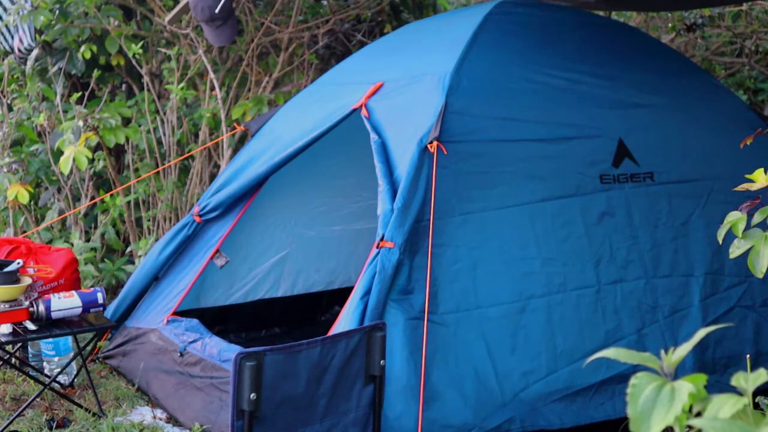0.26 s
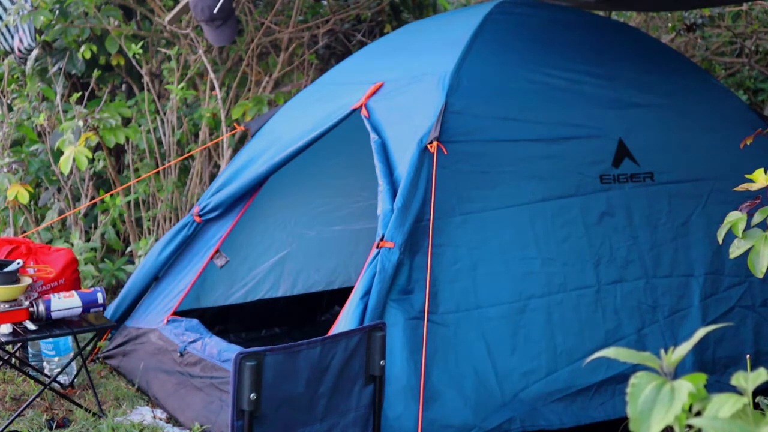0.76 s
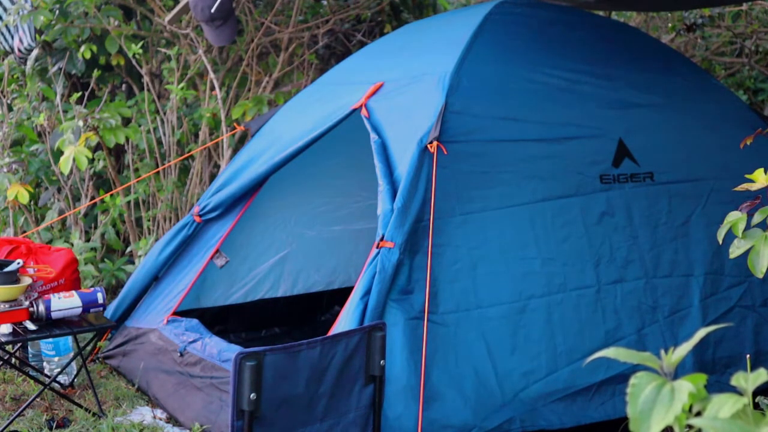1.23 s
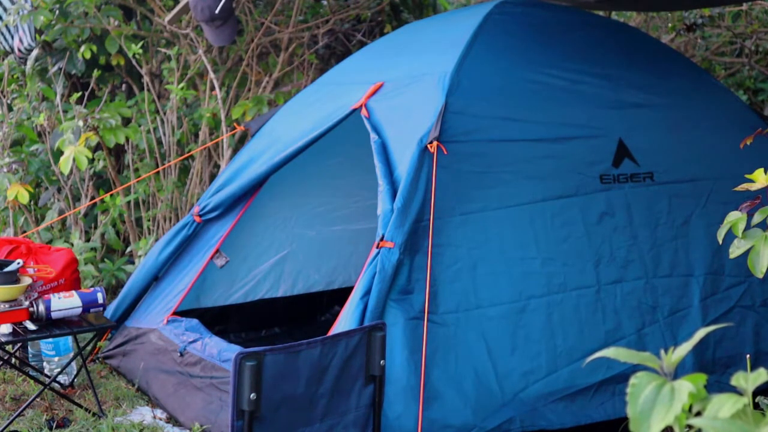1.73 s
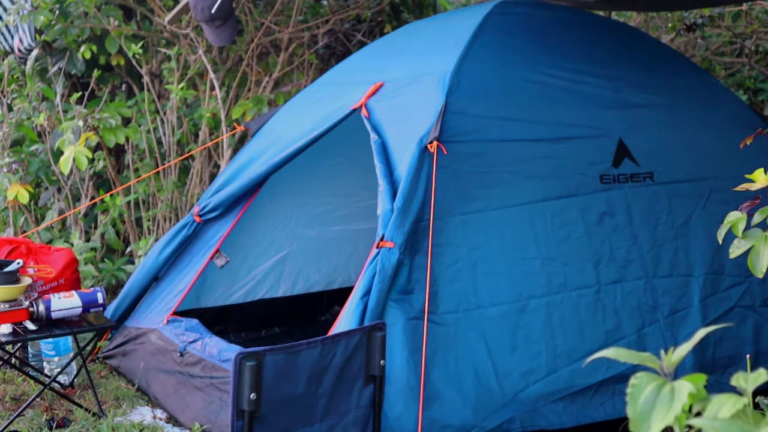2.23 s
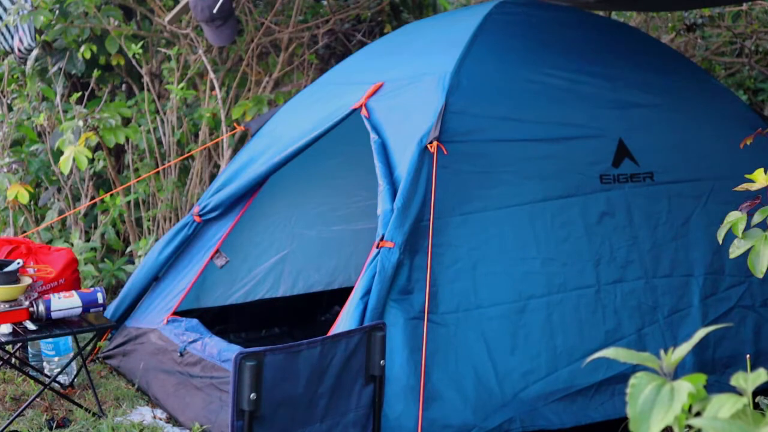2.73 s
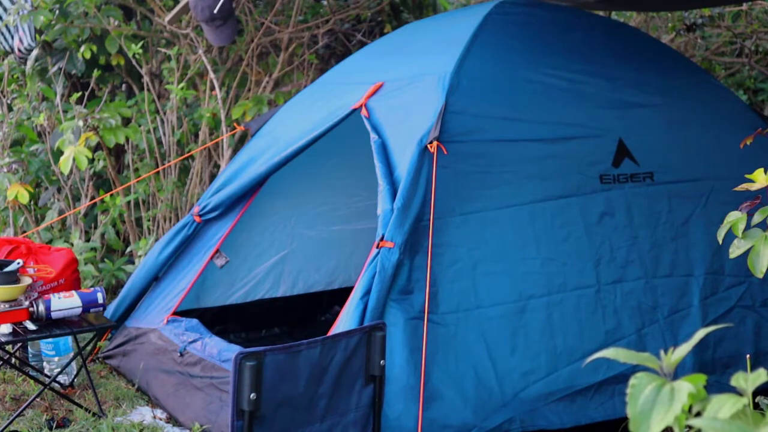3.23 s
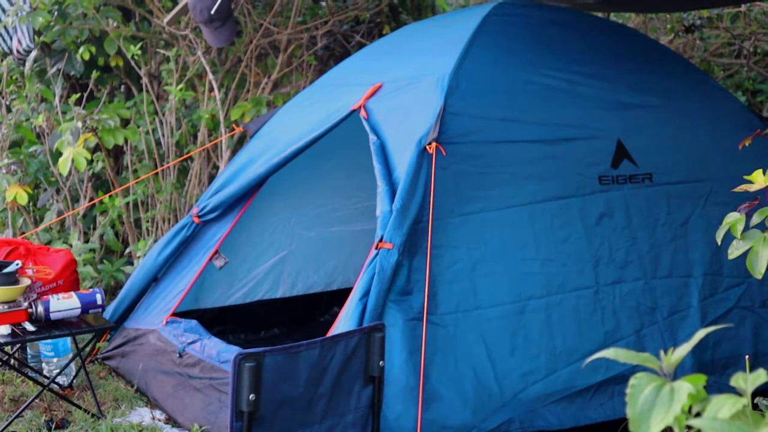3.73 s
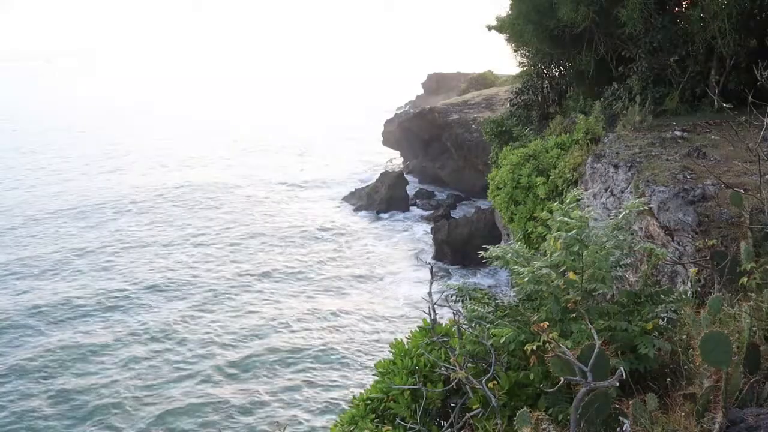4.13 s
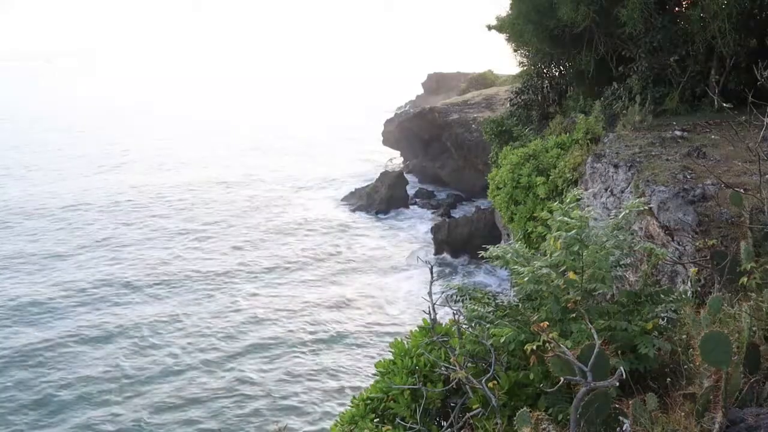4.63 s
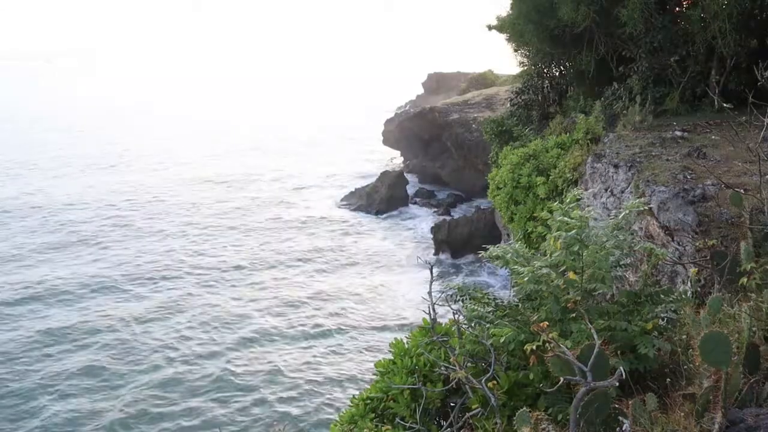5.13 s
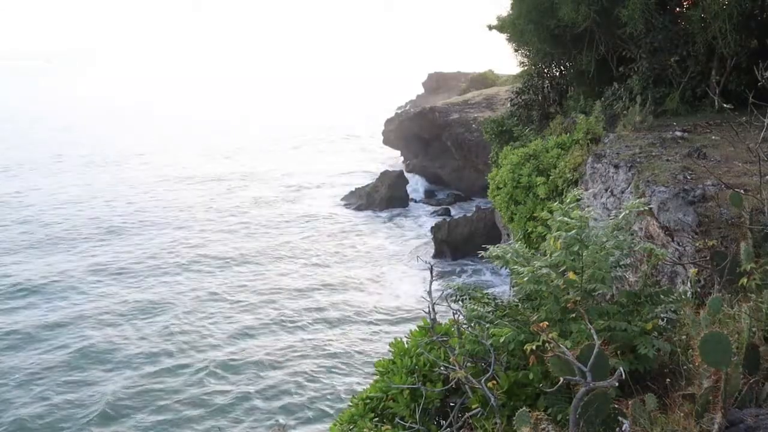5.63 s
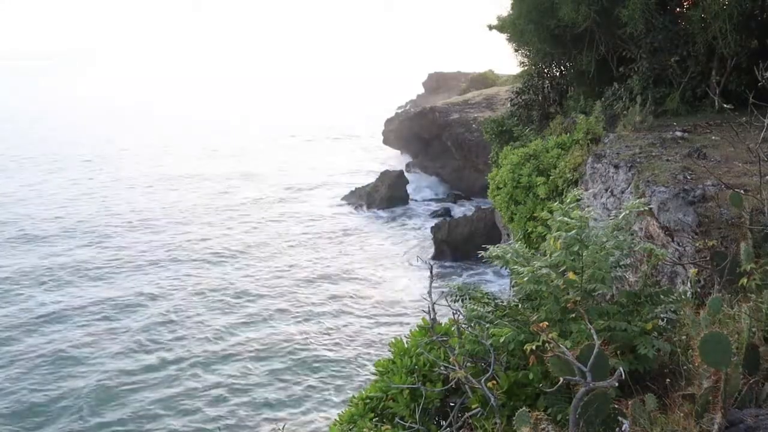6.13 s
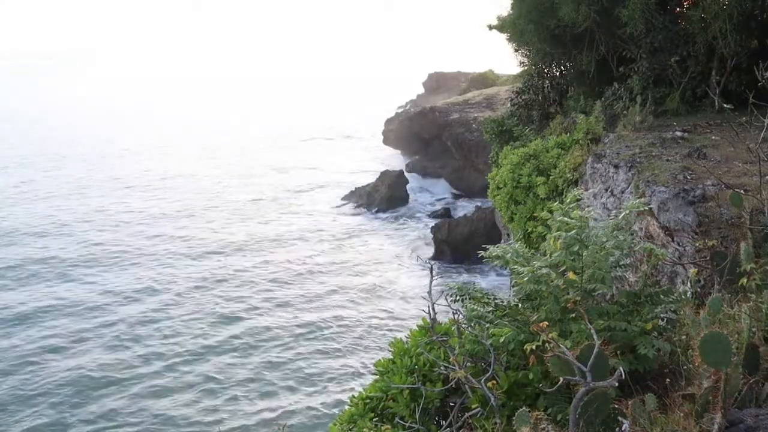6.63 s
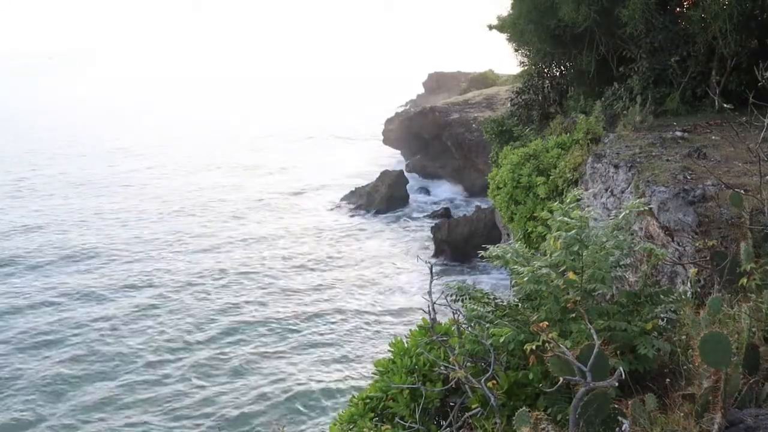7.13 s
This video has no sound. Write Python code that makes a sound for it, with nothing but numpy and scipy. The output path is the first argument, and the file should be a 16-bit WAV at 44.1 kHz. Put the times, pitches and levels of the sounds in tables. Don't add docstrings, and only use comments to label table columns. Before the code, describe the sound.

A quiet camp with trilling insects, dull far sea and rustling cloth switches suddenly to close surf booming, washing and fizzing below a cliff.

```python
import sys
import numpy as np
from scipy import signal
from scipy.fft import rfft, irfft, next_fast_len
from scipy.io import wavfile
from scipy.ndimage import uniform_filter1d, map_coordinates

SR = 44100
rng = np.random.default_rng(int(sys.argv[2]) if len(sys.argv) > 2 else 0)


def pcm_store(signal):
    levels = np.round(np.clip(np.atleast_2d(signal), -1, 1) * 32767)
    wavfile.write(sys.argv[1], SR, levels.astype(np.int16).T)


def volts_from_decibels(level):
    exponent = np.asarray(level, float) / 20
    return 10 ** exponent


N = 325017

# start_s, end_s
SILENCE = (3.8162, 3.8484)

# pitch_hz, level_db (per Hz)
BOOM_COLOUR = [(12, -60), (25, -14), (45, -3.5), (110, 1.5), (170, 0), (260, -9.5), (400, -43.5),
               (900, -120)]
WASH_COLOUR = [(50, -90), (120, -22), (220, -0.5), (330, -2.5), (550, -3.5), (850, -5), (1400, -13.5),
               (2200, -20.5), (4000, -42.5), (8000, -120)]
FOAM_COLOUR = [(300, -100), (800, -10), (1350, -12), (1700, 0), (2200, -1), (2900, -2.5), (3600, -5),
               (4500, -9), (6500, -17.5), (9000, -35), (13000, -110)]
SPRAY_COLOUR = [(1500, -100), (3500, -20), (5500, -5), (8000, -5.5), (10000, -6), (12000, -7.5),
                (15000, -20.5)]
SPLASH_COLOUR = [(200, -80), (700, -10), (1500, -2), (3000, 8), (5000, -7), (9000, -15), (15000, -25)]
# pitch_hz, level_db (per Hz)
FAR_BOOM_COLOUR = [(12, -60), (25, -17), (45, -4.5), (110, -1), (170, -3.5), (260, -14), (400, -63),
                   (900, -120)]
FAR_WASH_COLOUR = [(50, -88), (120, -14.5), (220, -3), (380, -4.5), (1000, -12.5), (1500, -19.5),
                   (2500, -37), (6000, -120)]
LEAF_COLOUR = [(300, -100), (800, -24), (1500, -3), (2300, -1.5), (3200, -7), (4200, -9.5), (5700, -12),
               (6800, -12.5), (8100, -19.5), (11500, -21), (13000, -24), (14200, -11.5), (16000, -43)]
# pitch_hz, level_db (per Hz)
BUZZ_COLOUR = [(6000, -100), (8000, -41), (9200, -17), (9950, -1.5), (10500, -8.5), (11300, -16.5),
               (12300, -42), (14000, -80)]
CHORUS_COLOUR = [(2500, -100), (3900, -42), (4400, -4), (4850, 0), (5250, -4), (5700, -58), (8000, -100)]
CLOTH_COLOUR = [(200, -90), (800, -30), (1800, 0.5), (3500, 0.5), (6000, -2.5), (9000, -6), (12000, -7),
                (14500, -26)]
CREASE_COLOUR = [(300, -83), (1200, -21), (2500, 5), (5000, 7.5), (9000, -7), (13000, -19), (16000, -40)]
# pitch_hz, likeness (1 same, -1 opposite)
SURF_ALIKE = [(60, 0.92), (130, 1), (290, 0.98), (640, 0.98), (1410, 0.88), (3090, 0.85), (6800, 0.38),
              (15000, -0.081)]
BOOM_ALIKE = [(30, .9996), (80, .9985), (160, .994), (300, .96)]
FAR_ALIKE = [(130, 0.9), (290, 0.89), (640, 0.71), (1410, 0.29), (3090, -0.14), (5500, -0.35),
             (7500, -0.44), (12500, -.5), (14000, -.88)]

# time_s, amount_db
WHITE_WATER = [(3.85, -.4), (3.9, -3), (4.03, -2), (4.28, -1.5), (4.42, -2.5), (4.68, .5), (4.85, 0),
               (5.06, -3), (5.45, -0.5), (5.8, -.5), (5.95, 0.8), (6.27, 3), (6.46, 2), (6.7, 2),
               (6.9, 3.5), (7.37, 2)]
# start_s, hold_s, lift_db
BREAKERS = [
    (3.88, 0.17, 2.5),
    (4.52, 0.027, 0.5),
    (4.66, 0.018, 4.5),
    (5.42, 0.16, 3),
    (5.7, .12, 2.5),
    (6.05, 0.22, 6),
    (6.5, .04, 4),
    (6.7, 0.078, 4.5),
    (7.25, 0.081, 3),
]
# start_s, hold_s, lift_db
PLUMES = [
    (6.45, 0.19, 1),
    (6.8, .6, 3),
]
# start_s, peak_db
SLAPS = [(4.2409, -22), (4.3177, -26), (4.6563, -23), (4.7048, -22), (5.043, -28), (5.3079, -30),
         (5.5379, -26), (5.7988, -38), (5.9036, -32), (6.0273, -30), (6.2423, -19), (7.2898, -21)]
# time_s, swell_db
FAR_SWELL = [(0, -1.5), (.8, -0.5), (1.6, 0), (2.3, 0.5), (3.0, 1), (3.8, 1.5)]
# start_s, hold_s, lift_db
FAR_BREAKERS = [
    (.2, 0.27, 2),
    (.92, .1, 1),
    (2.33, 0.045, 1.5),
    (2.68, 0.27, 2),
    (3.06, .04, 5),
]

# start_s, level_db
CAMP_CHIRPS = [(.14, -49), (.337, -49.5), (.547, -49.5), (.776, -49.5), (.98, -49.5), (1.179, -49),
               (1.383, -49.5), (1.585, -48.5), (1.787, -46), (1.985, -47.5), (2.192, -49), (2.389, -48.5),
               (2.588, -48), (2.793, -50), (2.99, -49.5), (3.197, -52), (3.427, -49), (3.63, -50.5)]
NEIGHBOUR_CHIRPS = [(1.884, -47), (2.112, -46.5), (2.339, -48), (3.326, -50)]
EDGE_CHIRPS = [(3.911, -39.5), (4.131, -41), (4.354, -41.5), (4.571, -42), (4.794, -42.5), (5.013, -41.5),
               (5.314, -45), (6.092, -40.5), (6.282, -40.5), (6.472, -42), (6.663, -41), (6.851, -41),
               (7.043, -39), (7.232, -40)]
# chirp_gap_s, stroke_gap_s, pitch_hz, level_db
FAR_SINGERS = [(.21, 0.026, 4950, 0), (0.27, 0.038, 4750, -0.5), (.187, 0.023, 5050, -17),
               (0.45, 0.044, 4850, -8)]

# after_s, length_s, from_ratio, to_ratio (of the key pitch), level_db
RISING = [(0, 0.0278, .94, 1.07, 0.5), (.025, 0.02, 1.001, .985, -3)]
TURNING = [(0, 0.0157, .95, .85, -0.43), (.027, 0.039, 1.01, 0.95, -1.7)]
FALLING = [(-.005, .01, 1.6, 1.32, -7), (0, .014, 1.29, 1.07, 0.7), (.011, .027, 1.01, .97, -1)]
# start_s, key_hz, level_db
RISES = [(1.381, 2310, -55), (1.683, 2417, -50), (1.991, 2400, -50), (2.305, 2430, -48.5),
         (2.629, 2410, -48)]
TURNS = [(1.46, 2200, -57), (1.764, 2280, -52), (2.074, 2400, -52), (2.385, 2450, -50), (2.705, 2300, -50)]
FALLS = [(1.58, 1710, -54), (1.89, 1687, -50.5), (2.203, 1747, -50.5), (2.524, 1722, -49.5)]
# start_s, length_s, from_hz, to_hz, level_db
WHISTLES = [(.127, 0.027, 2330, 2320, -53.5), (.26, .025, 2290, 2190, -52), (.577, .018, 2120, 1920, -54.5),
            (0.768, .05, 3180, 3050, -64), (1.28, .015, 1840, 2000, -52), (2.091, .02, 1810, 1800, -54),
            (2.951, 0.022, 2490, 2230, -49), (3.66, .03, 1485, 1370, -56)]

# start_s, hold_s, level_db
SHIFTS = [
    (1.29, .005, -63),
    (2.808, 0.073, -60),
    (2.94, 0.13, -49),
    (3.12, 0.1, -64),
    (3.263, .04, -48),
    (3.33, .05, -59),
    (3.672, .11, -57.5),
]
# start_s, peak_db
CREASES = [(1.285, -37), (2.9385, -33), (2.9684, -39), (2.999, -37), (3.004, -30), (3.0144, -36),
           (3.027, -35), (3.0514, -33), (3.095, -35), (3.2536, -41), (3.6589, -47)]
# start_s, peak_db
SIDE_TICKS = [(3.663, -38), (3.688, -41), (3.8822, -26), (4.0765, -31)]

# pitch_hz, fade_s (time to fall 60 dB)
BUSH_ECHO = [(1000, 0.58), (5000, 0.47), (12000, .1)]
# pitch_hz, difference_db
MIC_LEAN = [(60, 0), (150, .4), (380, 1.1), (1300, 1.1), (2600, 0), (5000, -.5)]
# pitch_hz, level_db
TOP_FALL = [(10500, 0), (11800, -5), (13000, -8), (14400, -11), (15000, -50), (16000, -100)]
# pitch_hz, level_db
BAND_FLOOR = [(4000, -110), (5700, -92), (6700, -95), (8100, -91), (9500, -97), (12000, -92),
              (12800, -93), (14500, -97)]


def unit(x):
    return x / np.sqrt(np.mean(x ** 2) + 1e-20)


def along(points, hz):
    f, v = np.transpose(points)
    return np.interp(np.log(hz + 1), np.log(f + 1), v)


def curve(rows):
    s, value = np.transpose(rows)
    return np.interp(np.arange(N) / SR, s, value)


def wobble(rate):
    knots = rng.standard_normal(int(N * 40 / SR) + 4)
    return map_coordinates(knots, [np.arange(N) * min(rate, 39) / SR])


def filtered(x, response):
    m = next_fast_len(N + 8192)
    return irfft(rfft(x, m) * response(np.fft.rfftfreq(m, 1 / SR)), m)[..., :N]


def rush(colour, alike, patchy_db, grains=0., grain_db=4.5):
    pair = rng.standard_normal((2, N))
    sizes = np.minimum(rng.exponential(size=N), 4)
    hits = (rng.random(N) < .012) * volts_from_decibels(grain_db * sizes)
    pair = pair + grains * pair * unit(uniform_filter1d(hits, size=24))
    z = signal.stft(pair, nperseg=512)[2]
    patches = uniform_filter1d(rng.standard_normal(z.shape[1:]), size=8, axis=0)
    patches = uniform_filter1d(patches, size=12, axis=1)
    pair = signal.istft(z * volts_from_decibels(patchy_db * unit(patches)), nperseg=512)[1][:, :N]

    def middle_and_side(hz):
        turn = np.arccos(np.clip(along(alike, hz), -1, 1)) / 2
        return volts_from_decibels(along(colour, hz)) * [np.cos(turn), np.sin(turn)]

    mid, side = filtered(pair, middle_and_side)
    return unit(np.array([mid + side, mid - side]))


def add(track, s, sound):
    track[round(s * SR):][:len(sound)] += sound


def glide(length, from_hz, to_hz, bend):
    u = np.arange(int(length * SR)) / (length * SR)
    phase = 2 * np.pi * np.cumsum(from_hz + (to_hz - from_hz) * u) / SR
    return np.sqrt(2) * np.sin(np.pi * u) ** bend * np.sin(phase)


def husky(depth, memory):
    return 1 + depth * unit(signal.lfilter([1], [1, -memory], rng.standard_normal(N)))


def placed(x, pan_db, lag_s, wet_db):
    sides = np.array([[1], [-1]])
    direct = filtered(x, lambda hz: np.exp(-1j * np.pi * hz * lag_s * sides)) * volts_from_decibels(pan_db / 2 * sides)
    hz, t, z = signal.stft(rng.standard_normal((2, SR // 3)), SR, nperseg=256)
    fade_db = -60 * t / along(BUSH_ECHO, hz)[:, None]
    tail = signal.istft(z * volts_from_decibels(fade_db), SR, nperseg=256)[1]
    tail = tail / np.linalg.norm(tail[0])
    late = np.pad(x, (200, 0))[None]
    return direct + volts_from_decibels(wet_db) * signal.fftconvolve(late, tail, axes=1)[:, :N]


def puffs(events, length, colour, gain_db):
    track, t = np.zeros(N + SR), np.arange(SR // 20) / SR
    for s, db in events:
        add(track, s, volts_from_decibels(db + gain_db - 60 * t / length) * rng.standard_normal(len(t)))
    return filtered(track[:N], lambda hz: volts_from_decibels(along(colour, hz)))


def breaking(waves):
    t = np.arange(N) / SR
    lift_db = np.zeros(N)
    for s, hold, db in waves:
        build = 1 + (t - s) / 0.094
        drain = 1 - (t - s - hold) / 0.13
        lift_db += db * np.clip(np.minimum(build, drain), 0, 1)
    return lift_db


def surf():
    white_db, lift_db = curve(WHITE_WATER), breaking(BREAKERS)
    surge = .5 * wobble(8) + .45 * wobble(17)
    boom_db = -30.5 + .2 * white_db + lift_db + .7 * surge
    wash_db = -29.5 + .3 * white_db + 0.3 * lift_db + .5 * surge
    foam_db = -37 + .95 * white_db + 1.1 * surge
    spray_db = -48 + 1.1 * white_db + breaking(PLUMES) + .8 * surge
    boom = volts_from_decibels(boom_db) * rush(BOOM_COLOUR, BOOM_ALIKE, patchy_db=-0.4)
    wash = volts_from_decibels(wash_db) * rush(WASH_COLOUR, SURF_ALIKE, patchy_db=0.45, grains=0.081)
    foam = volts_from_decibels(foam_db) * rush(FOAM_COLOUR, SURF_ALIKE, patchy_db=1.2, grains=0.13)
    spray = volts_from_decibels(spray_db) * rush(SPRAY_COLOUR, SURF_ALIKE, patchy_db=1, grains=.12)
    slaps = puffs(SLAPS, .02, SPLASH_COLOUR, gain_db=-2)
    return boom + wash + foam + spray + slaps


def far_surf():
    swell_db, lift_db, sway = curve(FAR_SWELL), breaking(FAR_BREAKERS), wobble(6.2)
    boom_db = -38 + 1.04 * swell_db + 0.97 * lift_db + 0.36 * sway
    wash_db = -41.5 + 0.66 * swell_db + 0.13 * lift_db + 0.23 * sway
    hiss_db = -51 + 0.28 * swell_db + 1.45 * wobble(5.35)
    boom = volts_from_decibels(boom_db) * rush(FAR_BOOM_COLOUR, BOOM_ALIKE, patchy_db=-0.24)
    wash = volts_from_decibels(wash_db) * rush(FAR_WASH_COLOUR, FAR_ALIKE, patchy_db=0.94)
    hiss = volts_from_decibels(hiss_db) * rush(LEAF_COLOUR, FAR_ALIKE, patchy_db=1.0, grains=0.073)
    return boom + wash + hiss


def chirps(rows, step, grow_db, count):
    strokes = []
    for s, db in rows:
        for k in range(count):
            strokes.append((s + k * step, db + grow_db * (k - 1) + rng.normal(0, 1.2)))
    return strokes


def crickets(strokes, length, from_hz, to_hz, gain_db):
    track = np.zeros(N + SR)
    for s, db in strokes:
        drift = rng.normal(1, 0.014)
        tone = glide(length, from_hz * drift, to_hz * drift, bend=0.98)
        add(track, s - length / 2, volts_from_decibels(db + gain_db) * tone)
    return track[:N] * husky(.25, .9)


def bird():
    track, notes = np.zeros(N + SR), list(WHISTLES)
    for shape, sung in ((RISING, RISES), (TURNING, TURNS), (FALLING, FALLS)):
        for s, key_hz, db in sung:
            for after, length, start, end, stroke_db in shape:
                notes.append((s + after, length, key_hz * start, key_hz * end, db + stroke_db))
    for s, length, from_hz, to_hz, db in notes:
        add(track, s, volts_from_decibels(db + 3.5) * glide(length, from_hz, to_hz, bend=0.26))
    return track[:N] * husky(.3, .92)


def cloth():
    t = np.arange(N) / SR
    moving = volts_from_decibels(-73)
    for s, hold, db in SHIFTS:
        swell_db = 450 * (t - s)
        settle_db = 170 * (s + hold - t)
        moving = moving + volts_from_decibels(db + np.minimum(0, np.minimum(swell_db, settle_db)))
    alike = [(2000, 0.65), (8000, 0.42)]
    rubbing = moving * rush(CLOTH_COLOUR, alike, patchy_db=0.0, grains=.9, grain_db=3.1)
    snaps = [(s + 0.00074, db) for s, db in CREASES]
    creases = puffs(snaps, 0.0028, CREASE_COLOUR, gain_db=2)
    return rubbing + placed(creases, pan_db=.1, lag_s=0, wet_db=-10)


def side_ticks():
    ticks = puffs(SIDE_TICKS, .005, CREASE_COLOUR, gain_db=3.5)
    return placed(ticks, pan_db=-.5, lag_s=9e-5, wet_db=-9)


def buzzers(level_db, alike):
    t, likeness = np.arange(N) / SR, [(9000, alike)]

    def throbbing(rate_hz):
        beat = np.exp(1.1 * np.cos(2 * np.pi * rate_hz * t + 0.47 * wobble(5.2)))
        return unit(beat * rush(BUZZ_COLOUR, likeness, patchy_db=.6))

    even = rush(BUZZ_COLOUR, likeness, patchy_db=0.4)
    choir = throbbing(100.4) + 0.71 * throbbing(110.2) + 2.0 * even
    return volts_from_decibels(level_db + 0.36 * wobble(6.9)) * unit(choir)


def far_crickets(level_db, blur_db):
    singers = np.zeros(N)
    for period, step, hz, db in FAR_SINGERS:
        starts = np.cumsum(period * rng.normal(1, .06, 50))
        strokes = [(s + k * step, db + rng.normal(0, 3.0)) for s in starts for k in range(3) if s < N / SR]
        singers += crickets(strokes, 0.015, hz * 1.06, hz * .94, gain_db=level_db)
    blur = rush(CHORUS_COLOUR, [(5000, 0.17)], patchy_db=2.5)
    blur = volts_from_decibels(level_db + blur_db + 0.45 * wobble(10)) * blur
    return blur + placed(singers, pan_db=-4.0, lag_s=4e-5, wet_db=-0.5)


def scene():
    camp = far_surf() + cloth() + buzzers(-43.5, alike=-0.44) + far_crickets(level_db=-59.5, blur_db=.5)
    strokes = chirps(CAMP_CHIRPS, step=.0305, grow_db=.1, count=3)
    strokes += chirps(NEIGHBOUR_CHIRPS, step=.034, grow_db=1.4, count=2)
    camp_crickets = crickets(strokes, .016, 5180, 4423, gain_db=-1.3)
    camp += placed(camp_crickets, pan_db=-1.5, lag_s=2.6e-5, wet_db=-4.5)
    camp += placed(bird(), pan_db=-6.0, lag_s=1.5e-5, wet_db=-5.5)

    edge = surf() + buzzers(-55.5, alike=-0.76) + far_crickets(level_db=-52.0, blur_db=-16)
    strokes = chirps(EDGE_CHIRPS, step=.0297, grow_db=1.4, count=3)
    edge_cricket = crickets(strokes, 0.014, 5546, 4760, gain_db=-0.5)
    edge += placed(edge_cricket, pan_db=-1.0, lag_s=4.5e-5, wet_db=-9.5)
    return np.where(np.arange(N) / SR < np.mean(SILENCE), camp, edge) + side_ticks()


def drop_faint_bands(x):
    middle_side = np.array([x[0] + x[1], x[0] - x[1]]) / 2
    hz, _, z = signal.stft(middle_side, SR, nperseg=2048)
    bands, centre_hz = z[:, :1024].reshape(2, 64, 16, -1), hz[8::16]
    spread_db = np.clip(centre_hz / 4000 - 1.5, 0, 3.5)[:, None, None]
    whim_db = rng.normal(0, 1, (2, 64, 1, z.shape[-1])) * spread_db
    floor = volts_from_decibels(along(BAND_FLOOR, centre_hz)[:, None, None] + whim_db)
    strength = np.sqrt(np.mean(abs(bands) ** 2, 2, keepdims=True))
    z[:, :1024] = (bands * (strength >= floor)).reshape(2, 1024, -1)
    mid, side = signal.istft(z, SR, nperseg=2048)[1][:, :N]
    return np.array([mid + side, mid - side])


def band_limit(x):
    return signal.sosfilt(signal.butter(12, 15560, fs=SR, output="sos"), x)


def record(dry):
    sides = np.array([[1], [-1]])
    heard = filtered(dry, lambda hz: volts_from_decibels(along(TOP_FALL, hz) + along(MIC_LEAN, hz) / 2 * sides))
    t = np.arange(N) / SR
    outside_s = np.maximum(SILENCE[0] - t, t - SILENCE[1])
    gate = np.clip(outside_s / .0001, 0, 1)
    mix = drop_faint_bands(heard) * gate
    return band_limit(mix)


dry = scene()
out = record(dry)
pcm_store(out)
```